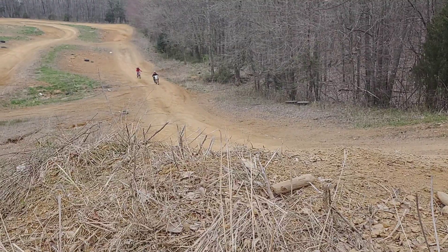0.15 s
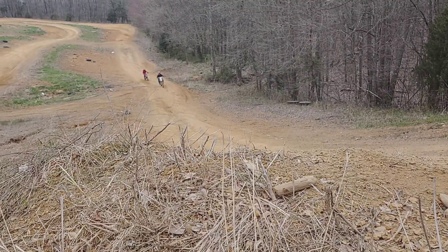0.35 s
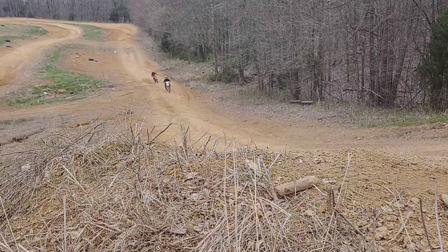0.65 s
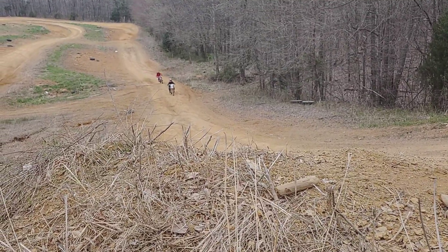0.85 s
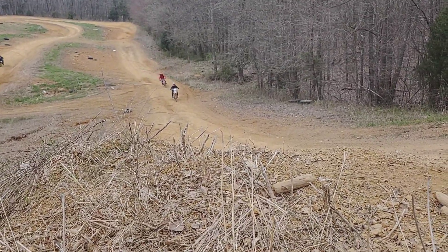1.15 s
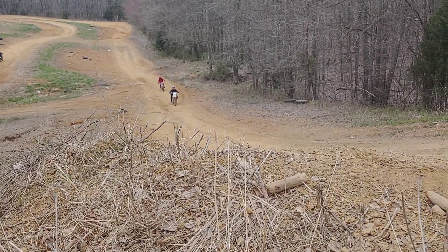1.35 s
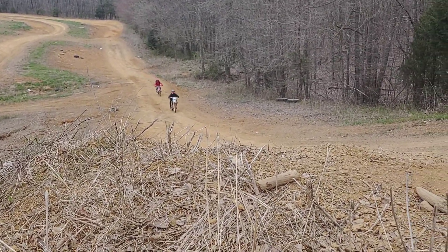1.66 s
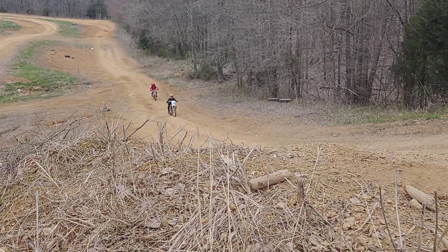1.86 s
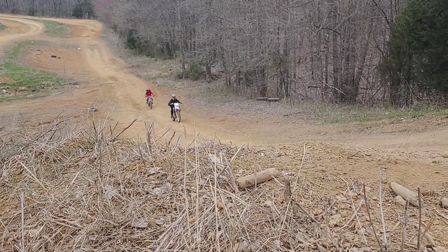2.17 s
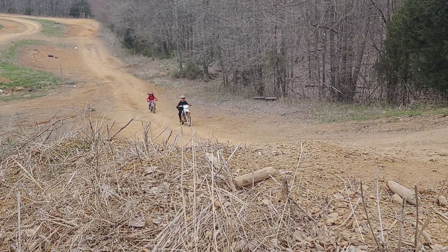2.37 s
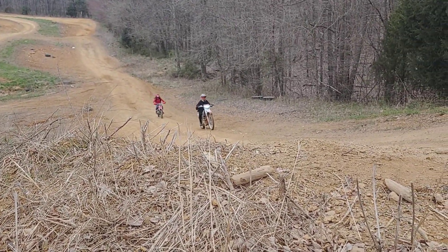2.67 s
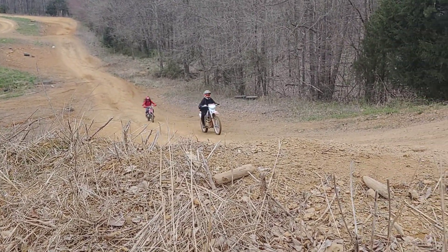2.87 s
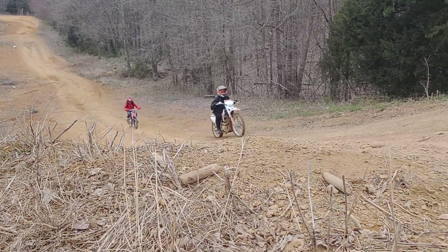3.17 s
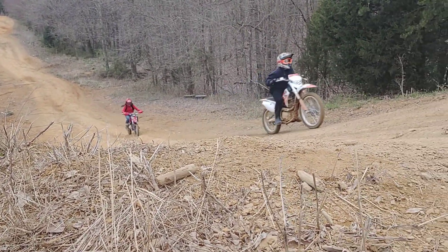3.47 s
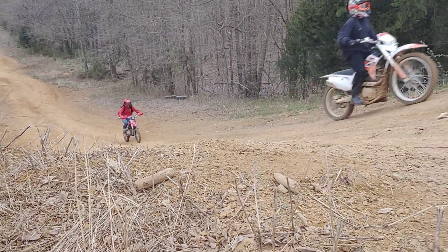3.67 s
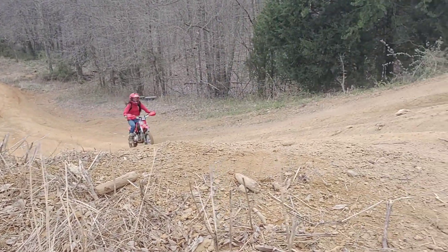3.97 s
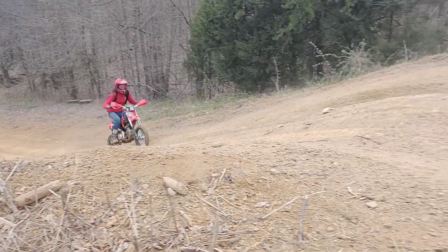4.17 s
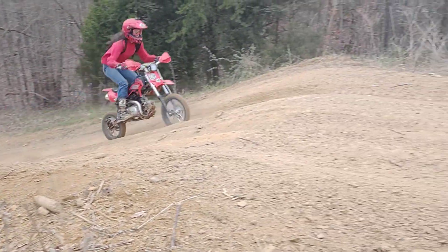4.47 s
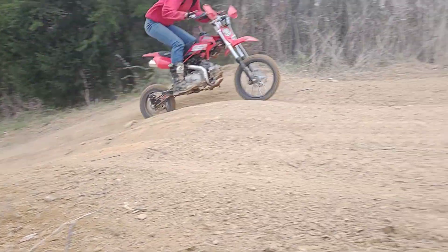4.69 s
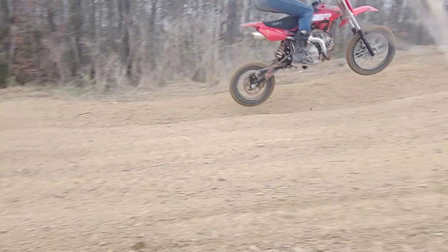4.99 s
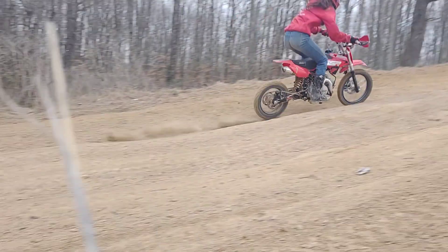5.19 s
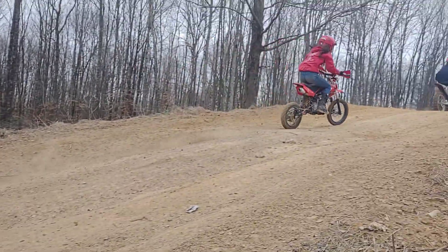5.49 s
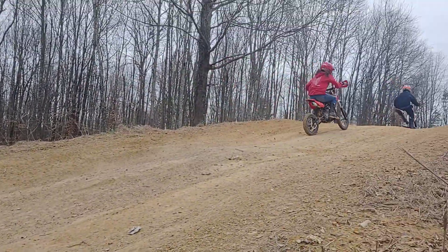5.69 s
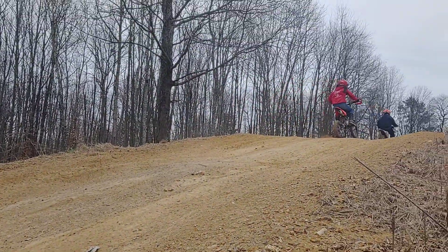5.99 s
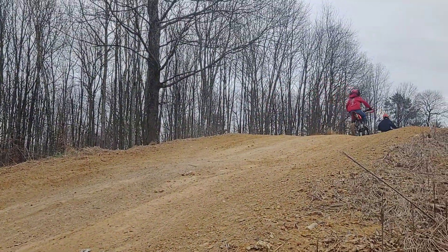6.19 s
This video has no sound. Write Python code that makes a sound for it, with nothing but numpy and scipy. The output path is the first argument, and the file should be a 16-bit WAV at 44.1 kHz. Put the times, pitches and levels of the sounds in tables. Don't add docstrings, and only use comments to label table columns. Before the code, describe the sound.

After brief silence, droning dirt bikes approach outdoors; the first passes and shuts its throttle, the second cracks past, revs, stumbles and rides off.

```python
import sys
import numpy as np
from scipy import signal
from scipy.fft import rfft, irfft, next_fast_len
from scipy.io import wavfile
from scipy.ndimage import map_coordinates

SR = 44100
rng = np.random.default_rng(int(sys.argv[2]) if len(sys.argv) > 2 else 0)


def volts_from_db(level):
    exponent = np.asarray(level, float) / 20
    return 10 ** exponent


def materialize(psi):
    bounded = np.clip(np.atleast_2d(psi).T, -1, 1)
    quanta = np.round(bounded * 32767).astype(np.int16)
    wavfile.write(sys.argv[1], SR, quanta)


N = 279814

# f/Hz, width/Hz, level/dB
HISS_MODES = [(1074, 500, 1), (3000, 790, 21.5), (4390, 2860, 14.5), (7100, 2500, 15.5), (11500, 5100, -45)]
START_S = .206
LEAD_PASS_S, LEAD_SWING_S = 3.657, 0.14
SMALL_PASS_S, SMALL_SWING_S = 4.946, 0.37


def rms_one(x):
    return x / np.sqrt(np.mean(x ** 2) + 1e-20)


def in_time(rows):
    s, *columns = np.transpose(rows)
    return [np.interp(np.arange(N) / SR, s, c) for c in columns]


def step(s, width_s):
    return .5 + .5 * np.tanh((np.arange(N) / SR - s) / width_s)


def low_pass(x, hz, order):
    return signal.sosfilt(signal.butter(order, hz, fs=SR, output="sos"), x)


def slow_wobble(hz):
    return rms_one(low_pass(rng.standard_normal(N), hz, order=2))


def coloured(x, points):
    hz, level_db = np.transpose(points)
    size = next_fast_len(N)
    axis_hz = np.arange(size // 2 + 1) * SR / size + 1
    gain = volts_from_db(np.interp(np.log(axis_hz), np.log(hz), level_db))
    return irfft(rfft(x, size) * gain, size)[..., :N]


def resonate(x, modes):
    out = 0
    for hz, width_hz, level_db in modes:
        r = np.exp(-np.pi * width_hz / SR)
        poles = [1, -2 * r * np.cos(2 * np.pi * hz / SR), r * r]
        out = out + volts_from_db(level_db) * (1 - r * r) * signal.lfilter([1, 0, -1], poles, x)
    return rms_one(out)


def later(x, ms):
    return map_coordinates(x, [np.arange(N) - ms * SR / 1000], order=3, mode="nearest")


def wind():
    # f/Hz, level/dB per Hz
    wind_spectrum = [(15, -28), (28, 2.5), (45, -50), (70, -10), (150, -12.5), (400, -22), (2000, -59)]
    shared, left, right, gusts = rng.standard_normal((4, N))
    lumps = volts_from_db(3.0 * rms_one(low_pass(gusts, 14, order=2)))
    level_db = -34.5 - 9 * step(5.4, .2)
    ports = [rms_one(coloured(lumps * (shared + 0.6 * own), wind_spectrum)) for own in (left, right)]
    return volts_from_db(level_db) * np.array(ports)


def woods(x, wet_db, dull_hz):
    decay = np.exp(-np.arange(SR // 4) / SR / .07)
    shared, *own = rng.standard_normal((3, SR // 4)) * decay
    taps = shared + own - low_pass(own, 1800, order=1)
    taps[:, :round(.004 * SR)] = 0
    taps = low_pass(taps, dull_hz, order=2)
    taps = taps - low_pass(taps, 300, order=1)
    taps = taps / np.sqrt(np.sum(taps ** 2, axis=1, keepdims=True))
    return x + volts_from_db(wet_db) * signal.fftconvolve(x, taps, axes=1)[:, :N]


def nearness(s, swing_s):
    return 1 / np.hypot(1, (np.arange(N) / SR - s) / swing_s)


def facing(ahead_db, hidden_db, behind_db, hides_s, shows_s, turn_s):
    hiding_db = (hidden_db - ahead_db) * step(hides_s, 0.14)
    return ahead_db + hiding_db + (behind_db - hidden_db) * step(shows_s, turn_s)


def path(pass_s, swing_s, air_db_per_s, lag_ms, lag_swing_ms, climb):
    t = np.arange(N) / SR
    level_ms, starts_s, crest_s, top_ms, beyond_ms, last_ms = climb
    moments_s = [starts_s, crest_s - .2, crest_s, crest_s + .1, t[-1]]
    echo_ms = np.interp(t, moments_s, [level_ms, top_ms, top_ms, beyond_ms, last_ms])
    left_lag_ms = lag_ms + lag_swing_ms * np.arctan((t - pass_s) / swing_s)
    return echo_ms, left_lag_ms, -air_db_per_s * np.maximum(pass_s - swing_s - t, 0)


def travel(sound, route, ground_db):
    # f/Hz, level/dB
    air_loss = [(20, 5), (7200, -6), (8600, -23), (11000, -31), (16000, -84)]
    echo_ms, lag_ms, treble_db = route
    far = np.clip(-treble_db / 20, 0, 1)
    shimmer_ms = .15 * np.sqrt(far) * slow_wobble(12)
    shimmer_ms = shimmer_ms + .3 * np.sqrt(np.minimum(4 * far, 1)) * slow_wobble(5)
    dull = coloured(sound, air_loss)
    sound = dull + np.minimum(volts_from_db(treble_db), 1) * (sound - dull)
    bounce = volts_from_db(ground_db) * low_pass(sound, 1400, order=1)
    delays_ms = (shimmer_ms + lag_ms / 2, shimmer_ms - lag_ms / 2)
    return np.array([later(direct, ms) + later(echo, ms + echo_ms - .09)
                     for direct, echo, ms in zip(sound, bounce, delays_ms)])


def firings(rate, crank, jitter_ms, spread_db):
    cycles = crank + np.cumsum(in_time(rate)[0]) / SR
    at = np.flatnonzero(np.diff(np.floor(cycles)))
    chance = rng.standard_normal((len(at), 2))
    jitter = np.round(chance[:, 0] * jitter_ms * SR / 1000).astype(int)
    clicks = np.zeros(N)
    clicks[np.clip(at + jitter, 0, N - 1)] = volts_from_db(spread_db * chance[:, 1])
    return cycles, clicks


def puff(clicks, ms):
    r = np.exp(-1000 / (ms * SR))
    return signal.lfilter([1], [1, -2 * r, r * r], clicks + 1e-18)


def turbulence(gate, modes, alike):
    shared, left, right = rng.standard_normal((3, N))
    alike = np.clip(alike, 0, 1)
    mixes = [np.sqrt(alike) * shared + np.sqrt(1 - alike) * own for own in (left, right)]
    return np.array([resonate(gate * mix, modes) for mix in mixes])


def small_bike():
    # t/s, rate/Hz
    firing_rate = [(.2, 52.27), (.55, 55.18), (.8, 55.85), (1.04, 59.41), (1.32, 54.98), (1.6, 59.87),
                   (3.9, 59.16), (4.6, 54.62), (4.9, 55.79), (5.14, 67.39), (5.21, 65.36), (5.33, 48.47),
                   (5.49, 47.73), (5.63, 54.86), (5.77, 45.33), (6.0, 45.14), (6.17, 51.64), (6.34, 51.28)]
    # t/s, level/dB
    load = [(.2, -27), (.4, -27.5), (.55, -25.5), (.72, -27), (.8, -32), (1.1, -33), (1.25, -29.5),
            (1.55, -34), (1.7, -47), (3.2, -37), (3.45, -33.5), (3.9, -28), (4.1, -28.5), (4.65, -26),
            (4.95, -25.5), (5.3, -29.5), (5.45, -27), (6.34, -28)]
    # t/s, level/dB
    misfires = [
        (5.215, -29),
    ]
    # f/Hz, width/Hz, level/dB
    boom_modes = [(132, 47, -1.5), (204.5, 31, 1.6), (403, 114, 0.69)]
    # f/Hz, width/Hz, level/dB
    thud_modes = [(288, 87, -0.36), (527, 190, 0.11), (974, 630, 0.72)]
    # f/Hz, width/Hz, level/dB
    crack_modes = [(1870, 140, 34), (2590, 1800, -39.5), (3280, 940, 45.5), (4530, 1400, 44.5),
                   (6400, 2950, 43), (10900, 13000, -78)]
    # level/ms, climb starts/s, crest/s, crest/ms, beyond/ms, last/ms
    jump = (.56, 4.7, 5.22, .8, .46, .41)
    hides_s, shows_s = 2.3, 4.7
    t = np.arange(N) / SR
    near = nearness(SMALL_PASS_S, SMALL_SWING_S)
    cycles, clicks = firings(firing_rate, .93, jitter_ms=.2, spread_db=1.3)
    for s, level_db in misfires:
        clicks[round((s - .007) * SR):round((s + .007) * SR)] *= volts_from_db(level_db)

    boom_db = np.clip(-28.5 - 10.5 * (t - 1.3), -60.5, -28.5) + 20.5 * near ** 2
    boom = resonate(puff(clicks, .25), boom_modes)

    crack_db, = in_time(load)
    thud_db = crack_db + facing(-5.5, -17.5, -6, hides_s, shows_s, turn_s=0.13)
    thud = resonate(puff(clicks, 0.16), thud_modes)

    gate = later(rms_one(puff(clicks, .55)) + volts_from_db(-9) * rms_one(puff(clicks, 1.6)), .25)
    crack = turbulence(gate, crack_modes, alike=.65)
    throat_hz = 2520
    throat = volts_from_db(facing(10.5, -12, 2, hides_s, shows_s + 0.053, turn_s=0.15))
    crack = crack + (throat - 1) * coloured(crack, [(throat_hz * 0.925, 0), (throat_hz * 3.2, -40)])

    hiss_db = -46.5 + 14 * near - 22 * np.maximum(t - SMALL_PASS_S - SMALL_SWING_S, 0)
    hiss = turbulence(1, HISS_MODES, alike=0.077)

    sound = volts_from_db(boom_db) * boom + volts_from_db(thud_db) * thud + volts_from_db(crack_db) * crack + volts_from_db(hiss_db) * hiss
    echo_ms, lag_ms, treble_db = path(SMALL_PASS_S, SMALL_SWING_S, air_db_per_s=10,
                                      lag_ms=0.012, lag_swing_ms=0.12, climb=jump)
    treble_db = treble_db + 22.5 * (1 - step(0.79, .03))
    return travel(sound, (echo_ms, lag_ms, treble_db), ground_db=-2.0)


def lead_bike():
    # t/s, rate/Hz
    firing_rate = [(.2, 51), (.35, 53.7), (.68, 55.3), (.92, 59.12), (1.3, 60.2), (1.76, 62.16),
                   (1.9, 64.14), (2.4, 63.8), (3.3, 64.58), (3.6, 62.52), (3.76, 60.4), (3.81, 55.6),
                   (4.04, 47.7), (4.4, 36.9), (4.64, 33.2), (5.0, 33), (5.6, 41), (6.34, 42)]
    # t/s, level/dB
    load = [(.2, -66), (.65, -49), (.82, -27), (1.45, -25.5), (1.7, -26), (2.0, -25), (2.75, -24),
            (3.2, -25.5), (3.5, -29.5), (3.7, -27), (4.1, -29.5), (4.4, -34.5), (4.75, -36.5),
            (4.95, -54.5), (6.34, -50.5)]
    # f/Hz, width/Hz, level/dB
    bark_modes = [(450, 645, 5), (840, 930, 3), (1160, 130, 5), (1980, 570, 7), (2570, 280, 9.5)]
    # f/Hz, width/Hz, level/dB
    thump_modes = [(111, 40, 24.5), (188.7, 66, 25), (267, 77, -20), (430, 240, -14)]
    # f/Hz, level/dB
    silencer = [(100, -25), (260, 4), (360, 5.5), (2900, -1), (3600, -21), (8000, -52)]
    # level/ms, climb starts/s, crest/s, crest/ms, beyond/ms, last/ms
    hill = (.9, 1.1, 3.83, 1.8, .68, 2.5)
    t = np.arange(N) / SR
    bark_db, = in_time(load)
    cycles, clicks = firings(firing_rate, .38, jitter_ms=.07, spread_db=1.1)

    turn = 2 * np.pi * cycles
    drone_db = bark_db - 2 + 5.5 * nearness(LEAD_PASS_S, 0.38)
    orders = np.cos(2 * turn + 1.05) + volts_from_db(-30) * np.cos(turn) + volts_from_db(-11) * np.cos(3 * turn + .9)
    drone = np.sqrt(2) * orders
    throttle = 1 - step(3.79, 0.026)
    throttle = throttle * volts_from_db(1.5 * slow_wobble(14))

    thump_db = bark_db + facing(-4, -11, 6, 3.16, 3.76, turn_s=0.022)
    thump = resonate(puff(clicks, 0.8), thump_modes)
    thump = later(thump, 12 * np.clip(t - 4.1, 0, 1))

    blast = puff(clicks, .08)
    blast = blast + volts_from_db(-12.0) * later(blast, 2.433)
    rasp = rms_one(puff(clicks, 16.0) * rng.standard_normal(N))
    bark = resonate(rms_one(blast) + volts_from_db(-6) * rasp, bark_modes)
    bark = rms_one(coloured(bark, silencer))
    top_hz = 810
    bark_top = coloured(bark, [(top_hz * 0.23, -40), (top_hz, 0)])
    bark = bark + (volts_from_db(-4.5 * (1 - step(1.88, 0.83))) - 1) * bark_top

    hiss_db = -40.5 + 11 * nearness(LEAD_PASS_S + 0.32, 0.25) - 25 * step(4.49, 0.27)
    hiss = turbulence(1 + 0.52 * rms_one(puff(clicks, 1.26)), HISS_MODES, alike=0.55)
    hiss = coloured(hiss, [(1500, 14.5), (2150, -22), (2650, 3.5)])

    sound = volts_from_db(drone_db) * throttle * drone + volts_from_db(thump_db) * thump + volts_from_db(bark_db) * bark + volts_from_db(hiss_db) * hiss
    route = path(LEAD_PASS_S, LEAD_SWING_S, air_db_per_s=10, lag_ms=0.086, lag_swing_ms=0.083, climb=hill)
    return travel(sound, route, ground_db=-6)


def scene():
    t = np.arange(N) / SR
    fade = volts_from_db(-12 * np.clip(1 - (t - START_S) / 0.2, 0, 1))
    bikes = woods(lead_bike() + small_bike(), wet_db=-11.0, dull_hz=5030)
    return (bikes + wind()) * fade * (t > START_S * SR / SR)


def top_cut(x):
    return signal.sosfilt(signal.butter(12, 16620, fs=SR, output="sos"), x)


def record(dry):
    # f/Hz, left minus right/dB
    port_colour = [(200, 0.5), (380, -0.5), (700, -2), (1290, -3), (2380, 4.5), (4400, 4), (8120, 0.5),
                   (15000, -20.5)]
    # f/Hz, level/dB
    mic_response = [(20, -16), (50, -16), (75, -8), (100, 0), (15100, 0), (16000, -32), (16800, -80)]
    hz, left_db = np.transpose(port_colour)
    left, right = [coloured(x, np.transpose([hz, side * left_db / 2])) for x, side in zip(dry, (1, -1))]
    right = signal.lfilter(*signal.butter(1, 79, "high", fs=SR), right)
    heard = coloured(np.array([left, right]), mic_response) * (np.arange(N) > START_S * SR)
    return top_cut(1.455 * np.tanh(heard / 0.84))


dry = scene()
out = record(dry)
materialize(out)
```